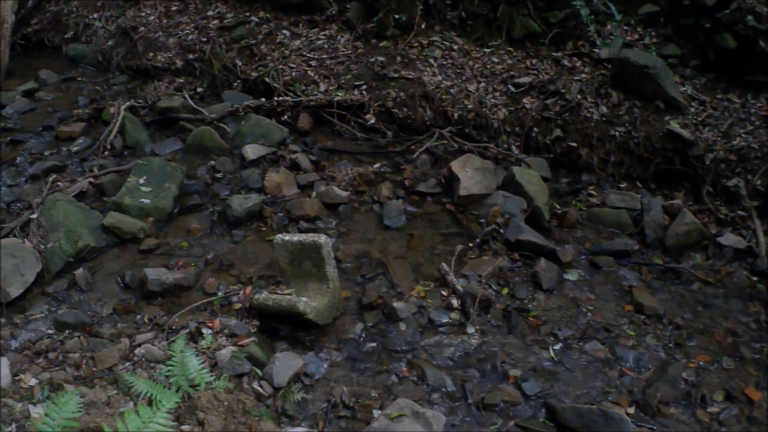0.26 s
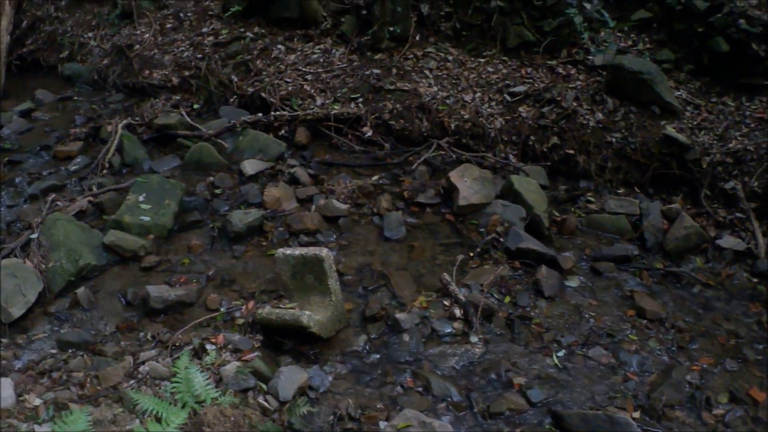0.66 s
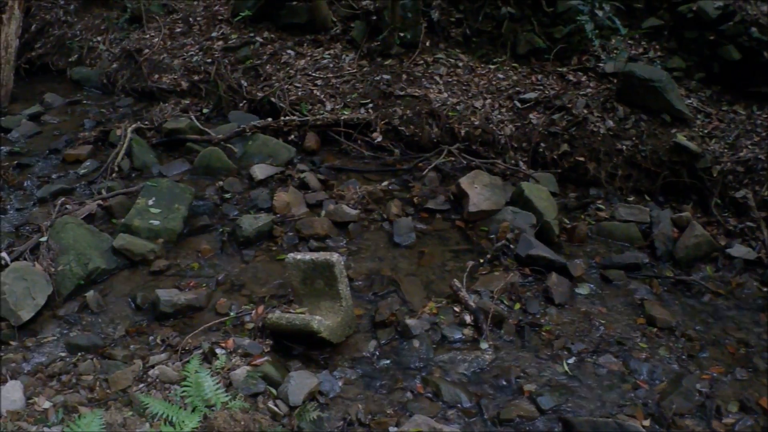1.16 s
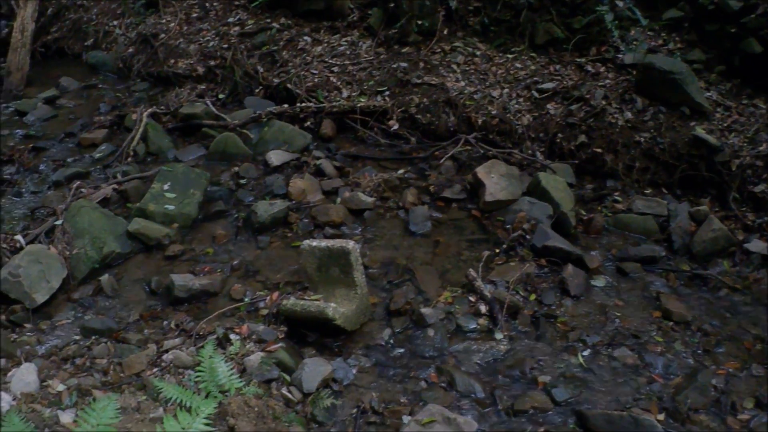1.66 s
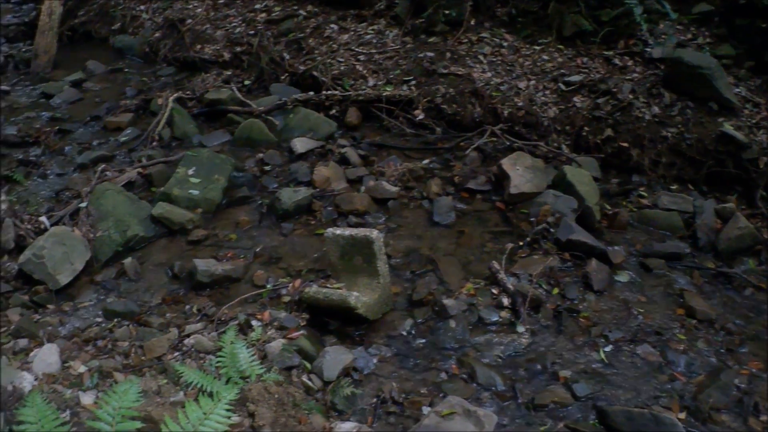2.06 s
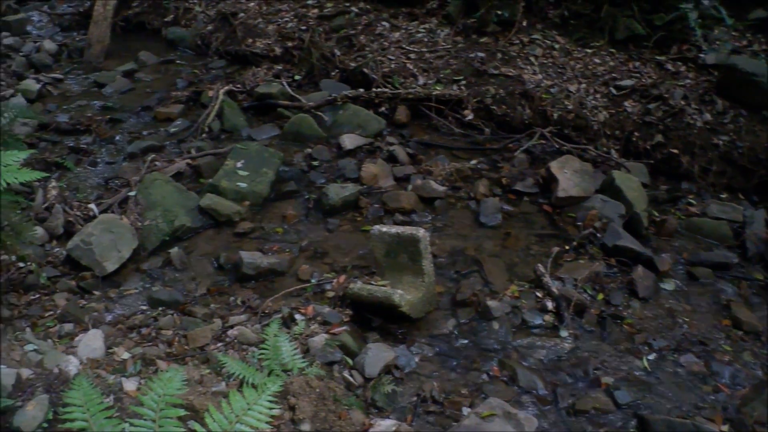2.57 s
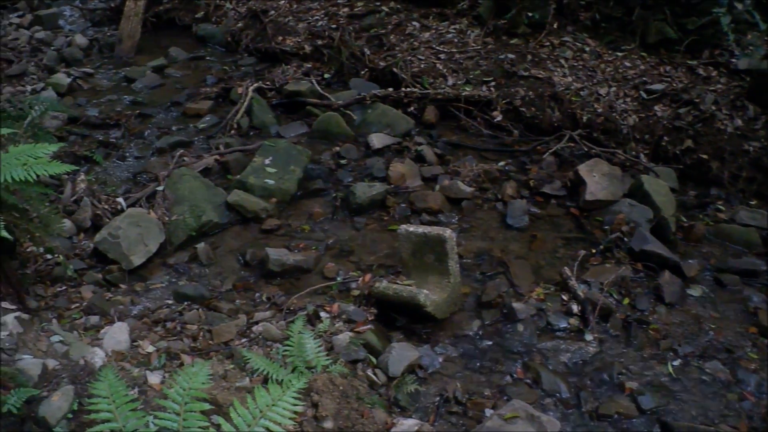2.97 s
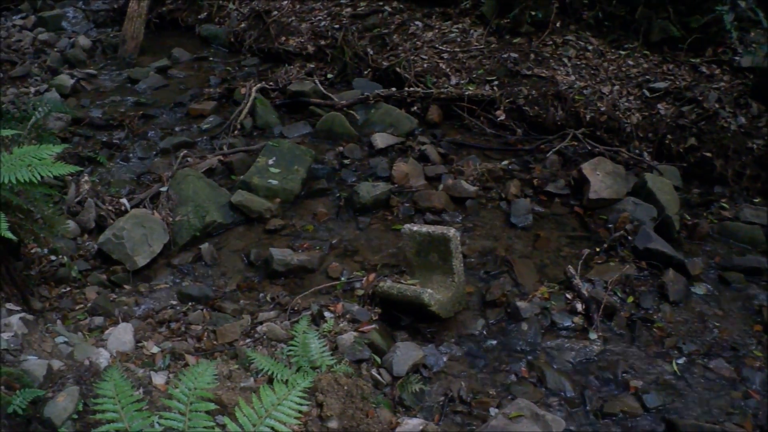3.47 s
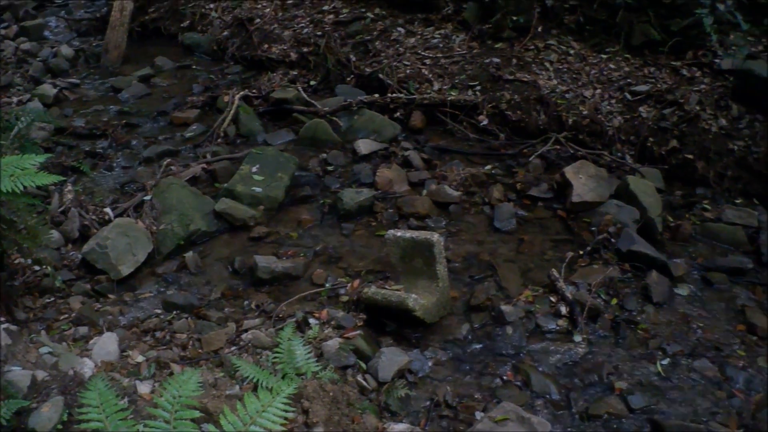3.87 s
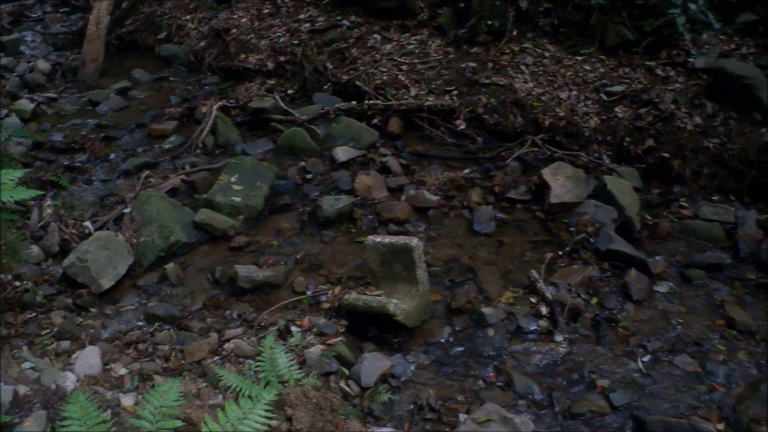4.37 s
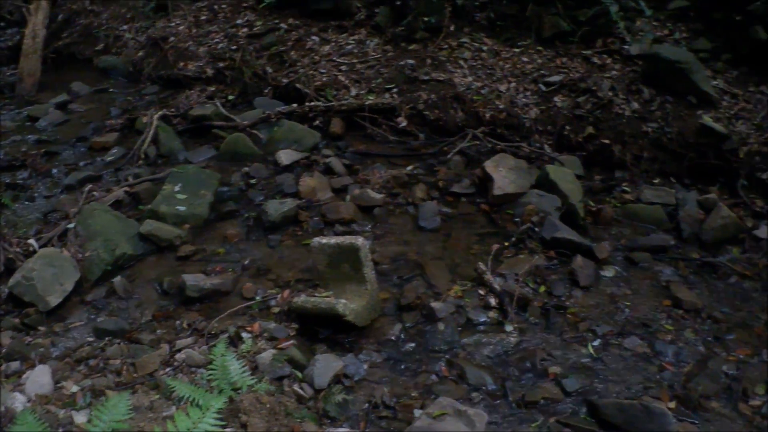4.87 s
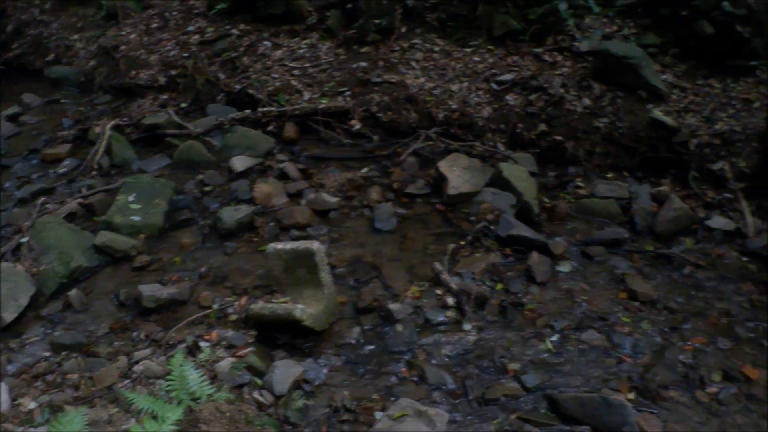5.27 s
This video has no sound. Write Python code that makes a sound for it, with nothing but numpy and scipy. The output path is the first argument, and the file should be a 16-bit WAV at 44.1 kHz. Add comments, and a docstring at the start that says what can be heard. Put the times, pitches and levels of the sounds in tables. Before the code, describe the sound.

A small stony stream in woodland, heard in stereo slightly right of centre, with low rumble, soft watery murmur and steady fine hiss throughout. From 0 to 1.8 s a small bird gives thin, high, gliding whistles: a few soft chirps, then a repeated two-part phrase growing slightly louder, blurred by trees. After a pause, at about 2.7 s the splashing jumps from faint to clearly brighter, then gradually eases, while a frog makes three quick soft clucks. A tiny rising drip sounds near 3.0 s, with the first short croak. Hollow, throaty, pulsing croaks follow at about 3.4, 3.7, 4.0, 4.3 and 4.65 s, stronger than the first, each under a tenth of a second, often preceded by faint clucks. Most slow down; the last two end in a rattle, the 4.65 one especially creaky. From 5.0 to 5.4 s come softer, broken croaks with brief stream-bed echo.

```python
"""A small bird chirps in the trees, then a frog clucks and croaks from a hollow among stones in a woodland stream.
Each croak is a train of larynx pulses that rings the resonances of throat and hollow; most slow down as the
air runs out, the slowest pulses limp in pairs, and some croaks end in a dying rattle. The bird is gliding whistles.
The brook, filtered noise and random spray, murmurs throughout; its splashing turns louder just as the frog begins.
One bubble drips in it, and the recorder adds its own steady hiss. Everything sits slightly to the right."""
import sys
import numpy as np
from scipy import signal
from scipy.fft import rfft, irfft, next_fast_len
from scipy.io import wavfile
from scipy.ndimage import map_coordinates

SR = 44100
rng = np.random.default_rng(int(sys.argv[2]) if len(sys.argv) > 2 else 0)


def unload_wav(signal):
    """Save mono or channel-first audio to the path in sys.argv[1] as 16-bit WAV at rate SR, clipped to [-1, 1]."""
    wavfile.write(
        sys.argv[1],
        SR,
        np.round(np.clip(np.atleast_2d(signal).T, -1, 1) * 32767).astype(np.int16),
    )


N = 243431
TIME = np.arange(N) / SR


def undb(db):
    """Decibels to gain."""
    return 10 ** (np.asarray(db) / 20)


def add(track, start_s, sound):
    """Mix a sound into a track, leaving out whatever falls beyond either end."""
    at = int(start_s * SR) + np.arange(len(sound))
    inside = (at >= 0) & (at < N)
    track[at[inside]] += sound[inside]


def pan(sound, left_minus_right_db):
    """Place a sound by the level difference between left and right."""
    channel_db = np.array([[left_minus_right_db], [-left_minus_right_db]]) / 2
    return sound * undb(channel_db)


def colour(sound, spectrum):
    """Filter a sound by a spectrum of (Hz, dB) points and bring it to an rms of 1."""
    hz, db = np.transpose(spectrum)
    size = next_fast_len(N)
    log_hz = np.log(np.fft.rfftfreq(size, 1 / SR) + 1)
    gain = undb(np.interp(log_hz, np.log(hz), db, left=-60, right=-90))
    filtered = irfft(rfft(sound, size) * gain, size)[..., :N]
    return filtered / np.sqrt(np.mean(filtered ** 2))


def walk(steps_per_s):
    """A smooth random drift with a spread near 1."""
    steps = rng.standard_normal(1024)
    return map_coordinates(steps, [TIME * steps_per_s], order=2, mode="mirror")


def spread(pair, likeness):
    """Blend two unrelated sounds into left and right with a given correlation."""
    shared = np.sqrt(1 + likeness) * pair[0]
    opposed = np.sqrt(1 - likeness) * pair[1] * np.array([[1], [-1]])
    return (shared + opposed) / np.sqrt(2)


def scatter(sound, t60_s, build_s, likeness):
    """Countless small echoes from stones, banks and trunks: noise that builds up and dies away by 60 dB in t60_s."""
    t = TIME[:SR]
    envelope = 1000 ** (-t / t60_s) * (1 - np.exp(-t / build_s))
    tail = spread(rng.standard_normal((2, SR)), likeness) * envelope
    tail /= np.sqrt(np.sum(tail ** 2) / 2)
    return signal.fftconvolve(sound[None], tail, axes=1)[:, :N]


# Relative spectrum of the recorder's hiss: frequency_hz, density_db (per Hz)
HISS = [(1060, -26), (1800, -5), (2520, -6), (3260, -4), (3700, -3), (4170, -2.5), (4530, -3.5),
        (5900, -4.5), (6350, -3.5), (8590, -5.5), (13300, -11.5), (15100, -6), (16000, -14)]
HISS_DB = -55.5


def hiss():
    """The recorder's own steady hiss: filtered noise, nearly unrelated in the two channels."""
    noise = colour(spread(rng.standard_normal((2, N)), 0.044), HISS)
    return pan(noise * undb(HISS_DB + 0.041 * walk(5.8)), -2.6)


def splashes(per_second, mean_boost_db):
    """Tiny one-sample bursts of spray, a few much stronger than the rest, in a bed of fizz."""
    hit = rng.random((2, N)) < per_second / SR
    size = undb(mean_boost_db * np.minimum(rng.exponential(size=(2, N)), 6))
    bursts = hit * size * rng.standard_normal((2, N))
    fizz = 0.43 * rng.standard_normal((2, N))
    return bursts + fizz


# The brook's lows over time, before the two gains below: start_s, rumble_db, murmur_db
BROOK_LOWS = [(0.0, -57.5, -58), (1.86, -58, -57.5), (2.21, -58.5, -58), (3.61, -54.5, -52.5),
              (3.8, -54.5, -53.5), (4.52, -63.5, -59), (5.01, -62, -60), (5.2, -61.5, -54.5),
              (5.52, -63.5, -59)]
RUMBLE_GAIN_DB, MURMUR_GAIN_DB = 2.5, 3
# Relative spectra of the brook's three layers: frequency_hz, density_db (per Hz)
RUMBLE = [(18, -4), (30, -3.5), (50, 1), (100, 1.5), (150, -3), (250, -6.5), (400, -11.5)]
MURMUR = [(130, -6.5), (250, -4), (450, -0.5), (650, 0.5), (1000, 0), (1300, -4), (1700, -8.5),
          (2400, -17.5), (4000, -37)]
SPLASH = [(940, -30), (1600, -2), (2040, -9), (2420, -6.5), (4700, -6.5), (9690, -7), (12700, -12),
          (15200, -15), (16000, -24)]
# the splashing steps up from faint to loud, then eases off
SPLASH_STEP_S, SPLASH_RISE_S = 2.68, 0.043
SPLASH_FAINT_DB, SPLASH_LOUD_DB, SPLASH_EASE_DB_PER_S = -64.5, -51, 1


def brook():
    """Water among stones: filtered noise for the rumble, random bursts for the murmur and the spray close by."""
    start_s, *columns = np.transpose(BROOK_LOWS)
    rumble_db, murmur_db = (np.interp(TIME, start_s, column) for column in columns)
    rumble_db = rumble_db + RUMBLE_GAIN_DB + 0.6 * walk(9.8)
    murmur_db = murmur_db + MURMUR_GAIN_DB + 0.51 * walk(16)
    since_step = np.maximum(TIME - SPLASH_STEP_S, 0)
    splash_db = np.interp(since_step, [0, SPLASH_RISE_S], [SPLASH_FAINT_DB, SPLASH_LOUD_DB])
    splash_db = splash_db - SPLASH_EASE_DB_PER_S * since_step + 1.57 * walk(23.976)

    rumble = colour(spread(rng.standard_normal((2, N)), 0.84), RUMBLE) * undb(rumble_db)
    murmur = colour(spread(splashes(900, 2.04), 0.68), MURMUR) * undb(murmur_db)
    splash = colour(spread(splashes(4000, 2.3), 0), SPLASH) * undb(splash_db)
    return pan(rumble, -2.0) + pan(murmur, -1.4) + pan(splash, -1.4)


DRIP_S, DRIP_DB, DRIP_T60_S = 2.969, -44.5, 0.037
DRIP_HZ, DRIP_RISE_HZ_PER_S = 2690, 25000


def drip():
    """One small bubble in the brook: a sine rising in pitch as it dies away."""
    t = TIME[:SR // 20]
    phase = 2 * np.pi * np.cumsum(DRIP_HZ + DRIP_RISE_HZ_PER_S * t) / SR
    track = np.zeros(N)
    add(track, DRIP_S, undb(DRIP_DB - 60 * t / DRIP_T60_S) * np.sin(phase))
    return pan(track, -1)


# Glides of a chirp at even steps through the note: pitch_ratio
ARCH = [.78, .91, 1, 1.05, .99, .9]
DIP = [1.03, 1.055, 1, .97, .965, 1.01]
HOOK = [1.04, 1.06, 1, .82, .92, 1.04]
FLICK = [.87, .92, .97, 1, 1, 1]
WARBLE = [.82, .9, 1, 1.09, .96, 1.08, .96, .9]
# Soft opening chirps: start_s, length_s, pitch_hz, level_db, share scattered by the trees (0-1), glide
OPENING = [(-.06, .096, 4730, -54.5, .4, ARCH), (.158, 0.072, 6500, -55.5, 0.53, HOOK),
           (.34, .088, 6400, -57.5, .35, HOOK), (.53, .122, 4420, -52, .16, WARBLE)]
# Repeated phrase: start_s (into the phrase), length_s, pitch_hz,
# level_db (in the first phrase), share scattered by the trees (0-1), glide
PHRASE = [(0, .086, 6780, -42, .75, DIP), (0.069, 0.051, 8090, -54.5, 0.9, FLICK),
          (0.236, .12, 4477, -44, .62, ARCH)]
SONG_START_S, SONG_END_S, PHRASE_PERIOD_S = .713, 1.8, .458
SONG_GROWTH_DB = 1  # per phrase


def song(count):
    """The opening chirps, then the phrase over and over, a little louder each time, until the bird breaks off."""
    chirps = list(OPENING)
    for k in range(count):
        for into_s, length_s, pitch_hz, level_db, share, glide in PHRASE:
            start_s = SONG_START_S + k * PHRASE_PERIOD_S + into_s
            if start_s < SONG_END_S:
                chirps.append((start_s, length_s, pitch_hz, level_db + k * SONG_GROWTH_DB, share, glide))
    return chirps


def bird():
    """Thin gliding sine whistles with a fast random tremble, much of them scattered by the trees."""
    direct, among_trees = np.zeros(N), np.zeros(N)
    tremble = .04 * walk(600)
    for start_s, length_s, pitch_hz, level_db, share, glide in song(count=3):
        u = np.linspace(0, 1, int(length_s * SR))  # progress through the note
        steps = u * (len(glide) - 1)
        hz = pitch_hz * map_coordinates(np.array(glide, float), [steps], order=2, mode="nearest")
        hz *= 1 + share * tremble[abs(int(start_s * SR)):][:len(u)]
        swell = np.sqrt(np.abs(np.sin(np.pi * u)))
        note = undb(level_db) * swell * np.sin(2 * np.pi * np.cumsum(hz) / SR)
        add(direct, start_s, np.sqrt(1 - share) * note)
        add(among_trees, start_s, np.sqrt(share) * note)
    near = undb(-2) * scatter(among_trees, t60_s=.11, build_s=.002, likeness=.3)
    far = undb(-6.5) * scatter(among_trees, t60_s=.72, build_s=.015, likeness=0)
    return pan(direct + near + far, -5.5)


# Resonances of throat and hollow while the vocal sac fills, is taut and goes slack: frequency_hz, level_db
FILLING = [(300, -36), (550, -8.5), (700, -6), (850, -14), (1050, 4), (1250, -4.5), (1600, -18),
           (2400, -32)]
TAUT = [(280, -58), (430, -19), (520, -8.5), (640, 1), (800, -13.5), (930, -17), (1130, 2), (1350, 2),
        (1480, -13), (1620, -24.5), (1950, -26), (2400, -63)]
SLACK = [(280, -37), (400, -16), (520, 6), (680, -14), (900, -18), (1080, -6.5), (1190, 4.5), (1350, -14),
         (1700, -21), (2400, -41)]
TAUT_FROM_S, SLACK_FROM_S = 3.2, 4.9


def sac(at_s):
    """The resonances of throat and hollow, which change in steps as the vocal sac tightens and slackens."""
    if at_s < TAUT_FROM_S:
        return FILLING
    return TAUT if at_s < SLACK_FROM_S else SLACK


def ring(spectrum):
    """The short causal (minimum-phase) ring of a body with a spectrum of (Hz, dB) points."""
    hz, db = np.transpose(spectrum)
    size = 2048
    log_hz = np.log(np.fft.rfftfreq(size, 1 / SR) + 1)
    # beyond the outermost points the level falls by up to 20 dB more
    outside = np.abs(log_hz - np.clip(log_hz, np.log(hz[0]), np.log(hz[-1])))
    gain = undb(np.interp(log_hz, np.log(hz), db) - 20 * np.minimum(outside, 1))
    # folding the cepstrum onto positive times makes the ring start at once
    cepstrum = irfft(np.log(gain))
    cepstrum[1:size // 2] *= 2
    cepstrum[size // 2 + 1:] = 0
    return irfft(np.exp(rfft(cepstrum)))


PUSH_DB, FALL_BEND = 2.5, 1.15  # growth of level in the push; curve of the pulse rate's change after it
LIMP_BELOW_HZ, LIMP_SHARE = 215.4, 0.814  # slower pulses pair up, a short gap and a long one
STEADY_ROUGH = .003  # roughness that stays once the larynx has settled


def croak(length_s, push_s, start_hz, pushed_hz, end_hz, fade_db, rough):
    """Larynx pulses, rougher while the push of air swells; then they settle, shift in rate, weaken and limp if slow."""
    chance = rng.standard_normal((64, 2))
    pulses, t = np.zeros(SR // 5), 0.
    for k, (late, strong) in enumerate(chance):
        if t > length_s:
            break
        pushed = min(1, t / push_s)
        spent = (t - push_s) / (length_s - push_s) if t > push_s else 0
        hz = start_hz + (pushed_hz - start_hz) * pushed + (end_hz - pushed_hz) * spent ** FALL_BEND
        db = PUSH_DB * (pushed - 1) - fade_db * (t / length_s) ** 2
        uneven = STEADY_ROUGH + rough * (t < push_s)
        pulses[round(t * SR)] = undb(db + 8.3 * np.sqrt(uneven) * strong)
        limp = LIMP_SHARE * max(0, 1 - hz / LIMP_BELOW_HZ)
        t += np.exp(uneven * late) * (1 - limp * (-1) ** k) / hz
    return pulses


RATTLE_GAP_S, RATTLE_SLOWING, RATTLE_FALL_DB = .008, 1.1, 7.5  # first gap; gap ratio and level loss per pulse


def rattle(count):
    """Loose pulses for the end of a croak, at widening gaps, each weaker than the one before."""
    k = np.arange(count)
    pulse_s = np.cumsum(RATTLE_GAP_S * RATTLE_SLOWING ** k)
    pulses = np.zeros(SR // 5)
    pulses[np.round(pulse_s * SR).astype(int)] = undb(-RATTLE_FALL_DB * k)
    return pulses


# Croaks, levels before FROG_DB: start_s, length_s, push_s, pulse rate start_hz, pushed_hz (after the push)
# and end_hz, level_db, fade_db, roughness added in the push (0-1), rattle_db (practically silent in several)
CROAKS = [(2.985, .013, .002, 363, 345, 325, 3.5, 4, 0.03, -30),
          (3.0011, 0.035, 0.0021, 307, 299.6, 160, 4, 8, 0.02, -14),
          (3.3845, .078, .02, 471.4, 450, 278.6, 8.5, 2, .05, -3),
          (3.6714, 0.065, 0.0033, 453, 444, 256, 11, 8, 0.03, -15),
          (3.964, 0.07, 0.0028, 448, 448, 238, 11.5, 9, 0.01, -14),
          (4.2846, 0.051, .016, 411, 396, 215, 12, 6, .001, 7.5),
          (4.6497, .052, 0.0029, 265, 244.8, 58, 11.5, 4.5, 0, 8.5),
          (5.0155, .03, 0.018, 249.6, 433, 413, 3.5, 0.5, 0.06, -30),
          (5.05, .012, .002, 392, 387, 368, 6, 3, 0.04, -30),
          (5.0675, .0302, .011, 285, 276, 209, 6, 11, .01, -9),
          (5.116, 0.094, .1, 192, 138.3, 130, -11.5, 9, 0.14, -24),
          (5.3274, 0.036, 0.017, 285, 320.3, 241, 7.5, 3.5, 0.09, -20),
          (5.376, 0.011, 0.0047, 275, 266, 235, -0.5, 4, 0.06, -14)]
# Soft clucks, three to begin with, then one or two ahead of many croaks: start_s, level_db (before FROG_DB)
CLUCKS = [(2.6984, -0.5), (2.7129, -0.5), (2.731, -1.5), (2.9685, 0), (3.3537, -7), (3.3777, -2),
          (3.6366, -3.5), (3.9331, -6), (4.248, -2), (4.6058, -3), (5.3022, -4.5)]
FROG_DB, FROG_PAN_DB = 1, -1


def frog():
    """Pulses ringing throat and hollow as croaks and lone clucks, with echoes of stream bed and, faintly, wood."""
    voice = np.zeros(N)
    for start_s, length_s, push_s, start_hz, pushed_hz, end_hz, level_db, fade_db, rough, rattle_db in CROAKS:
        body = ring(sac(start_s))
        pulses = croak(length_s, push_s, start_hz, pushed_hz, end_hz, fade_db, rough)
        add(voice, start_s, undb(level_db) * signal.fftconvolve(pulses, body))
        add(voice, start_s + length_s, undb(rattle_db) * signal.fftconvolve(rattle(count=3), body))
    for start_s, level_db in CLUCKS:
        add(voice, start_s, undb(level_db) * ring(sac(start_s)))
    voice *= undb(FROG_DB)
    direct = np.array([np.roll(voice, 1), voice])  # it reaches the right side one sample earlier
    bed = undb(-14.0) * scatter(voice, t60_s=0.22, build_s=0.0029, likeness=0.82)
    wood = undb(-32) * scatter(voice, t60_s=1.0, build_s=0.024, likeness=0.82)
    return pan(direct + bed + wood, FROG_PAN_DB)


def scene():
    """The recorder's hiss, brook, drip, bird and frog together."""
    return hiss() + brook() + drip() + bird() + frog()


TOP_HZ = 15800


def record(dry):
    """The recorder cuts the top of the treble with a steep low-pass."""
    low_pass = signal.ellip(10, .2, 70, TOP_HZ, fs=SR, output="sos")  # order, ripple dB, stop-band dB
    return signal.sosfilt(low_pass, dry)


dry = scene()
out = record(dry)
unload_wav(out)
```